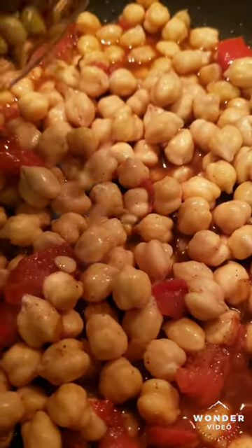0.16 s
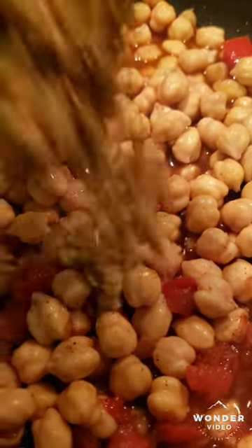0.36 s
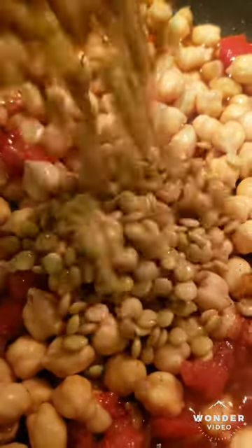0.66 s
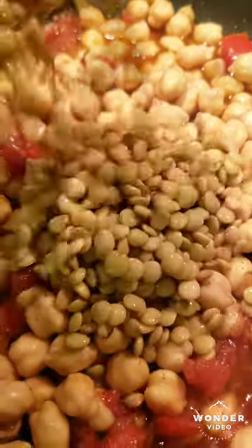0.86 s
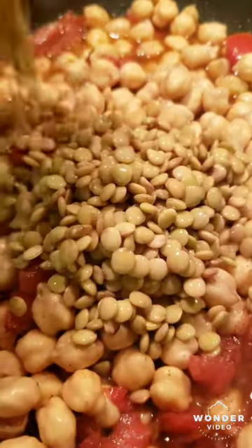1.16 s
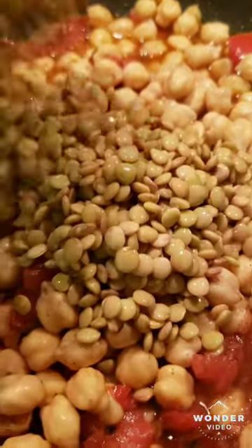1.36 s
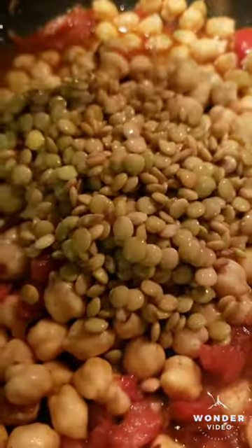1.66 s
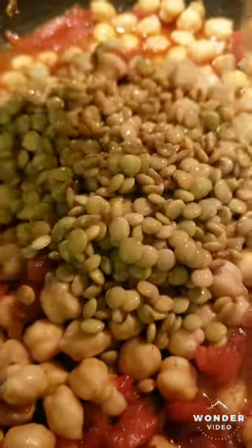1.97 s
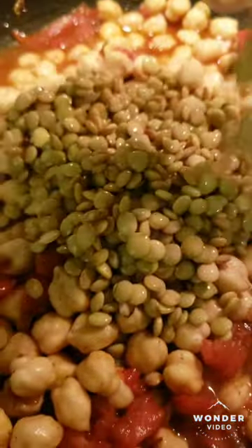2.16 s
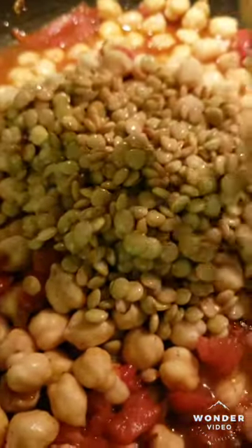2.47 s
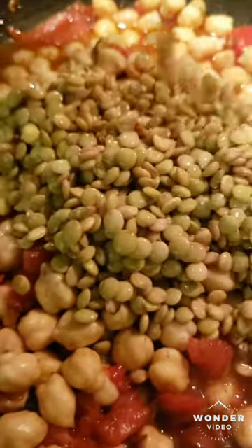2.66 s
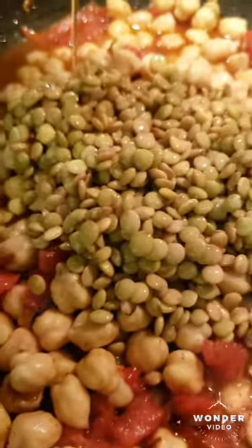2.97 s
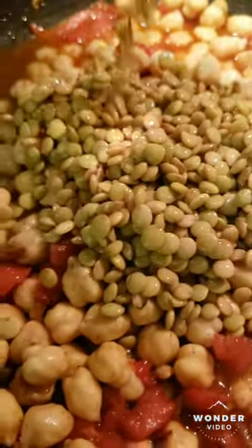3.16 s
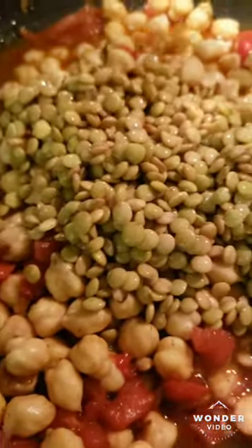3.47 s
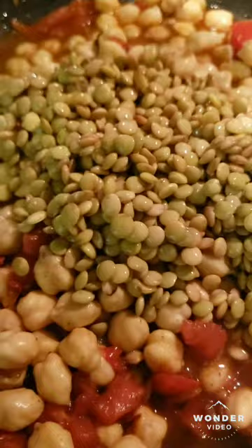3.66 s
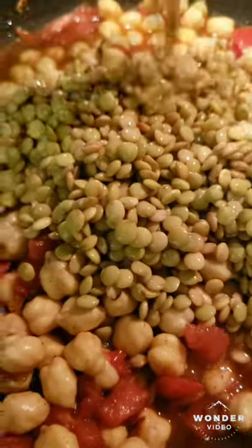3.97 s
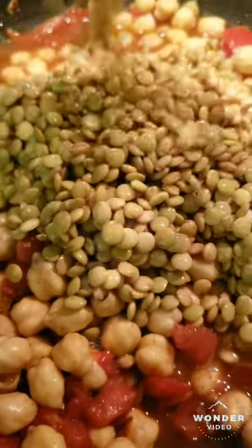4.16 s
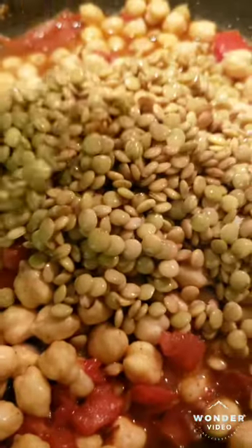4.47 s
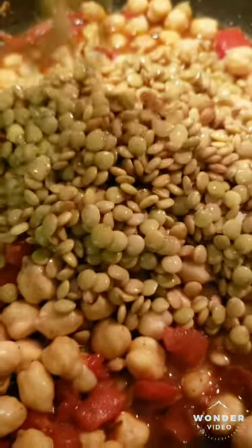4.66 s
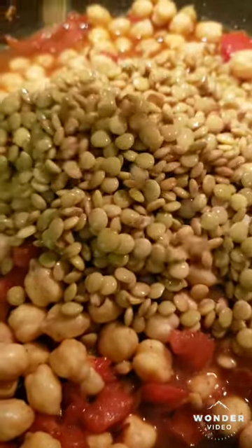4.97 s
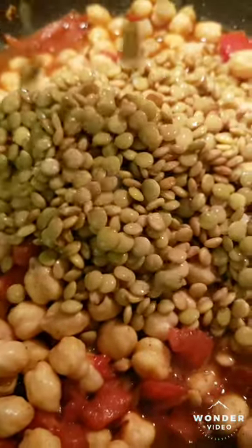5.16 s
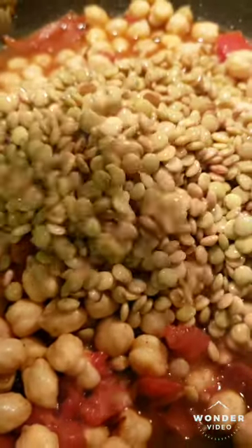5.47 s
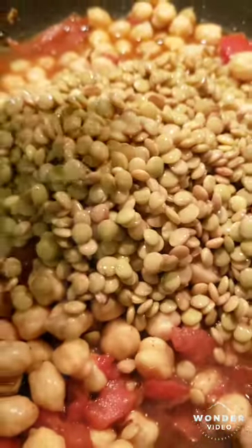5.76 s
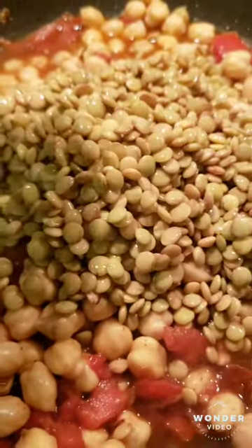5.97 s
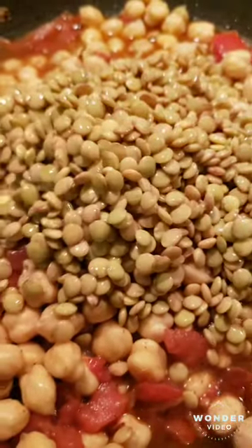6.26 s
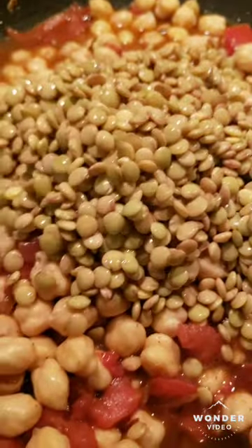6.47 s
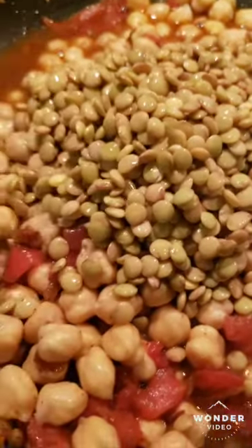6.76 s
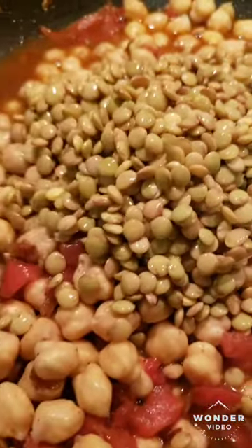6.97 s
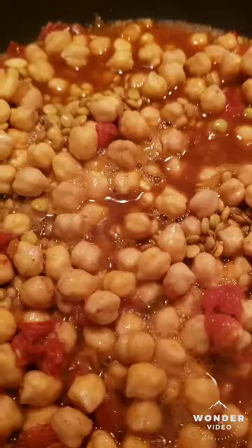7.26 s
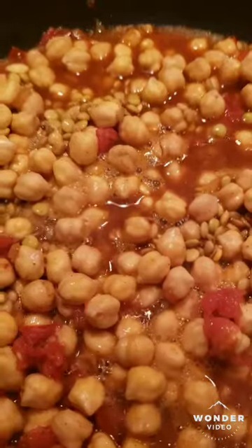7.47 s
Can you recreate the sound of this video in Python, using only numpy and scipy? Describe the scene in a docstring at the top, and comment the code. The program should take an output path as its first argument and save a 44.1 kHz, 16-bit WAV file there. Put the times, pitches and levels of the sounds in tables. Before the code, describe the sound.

A close stereo microphone hears lentils scattering onto simmering chickpeas: first a few clicks, then fuller rushes of grainy patter, separated by sparse drops. Faint bright sizzling swells with each pour, with little snaps and spits. Steady fan hum and air sit behind in the small room. Finally only fan and faint simmer remain before light contacts rattle, the full pan thuds once, sauce slops, and sound cuts out momentarily.

```python
"""In a small kitchen, a phone close to the pan hears lots of dry lentils poured onto simmering chickpeas.
The lentils are tiny ringing clicks and soft thuds, the wet crackle is shorter, brighter grains.
Lentils striking or bubbles popping add short clicks, each a noisy snap and a two-part ring; spits of sauce
are ticks of noise; a fan of steady tones and filtered air hums behind. At the end something clatters, the
pan takes one dull knock from a push and damped modes, and the sound drops out for a moment."""
import sys
import numpy as np
from scipy import signal
from scipy.fft import rfft, irfft
from scipy.io import wavfile
from scipy.ndimage import uniform_filter1d

SR = 44100
rng = np.random.default_rng(int(sys.argv[2]) if len(sys.argv) > 2 else 0)


def master(y):
    """Save y as 16-bit WAV."""
    cut = np.clip(np.atleast_2d(y).T, -1, 1)
    pcm = np.round(cut * 32767)  # scale
    wavfile.write(sys.argv[1], SR, pcm.astype(np.int16))


N = 335619
TIME = np.arange(N) / SR

# Levels in these tables are relative: each source adds its own trim, tone and room.
# Lots of lentils tipped in. Each row: start in seconds, length in seconds, patter level in dB,
# soft thud level in dB, wet crackle level in dB.
LENTIL_LOTS = [(0.086, 0.072, -63, -77, -75.5), (0.338, 0.25, -62.5, -66, -75.5),
               (0.589, 0.49, -55.5, -58.5, -66.5), (1.156, 0.19, -62, -65, -69),
               (1.44, 0.36, -60, -67, -72.5), (1.94, 0.12, -65.5, -65, -76.5),
               (2.337, 0.028, -64.5, -63, -74), (2.438, 0.072, -54.5, -56, -65),
               (2.552, 0.29, -53.5, -59, -66), (3.355, 0.15, -66, -90, -73.5), (3.809, 0.15, -65, -70, -73),
               (3.983, 0.099, -58.5, -67.5, -73.5), (4.085, 0.025, -60, -65.5, -66),
               (4.186, 0.13, -54.5, -65, -66), (4.41, 0.076, -63, -69, -74),
               (4.695, 0.044, -65, -65, -77.5), (4.87, 0.12, -61.5, -67.5, -73.5),
               (5.109, 0.078, -65, -70, -82), (5.325, 0.13, -63, -71, -79),
               (5.536, 0.26, -61, -63.5, -76.5)]
# A lot builds up quickly, thins while it runs, then the last grains settle; the wet crackle lingers.
ATTACK_S, THINNING_DB_PER_S = 0.013, 5
SETTLE_DB_PER_S, CRACKLE_SETTLE_DB_PER_S = 97, 63
# The food simmering by itself. Each row: time in seconds, crackle level in dB.
SIMMER_LEVEL = [(0, -77.5), (2.3, -74.5), (3.2, -83), (5.9, -79.5), (6.2, -93), (6.7, -87), (7.44, -84),
                (7.5, -70)]
# Short ringing clicks, lentils striking and bubbles popping, loud and faint.
# Each row: start in seconds, level in dB, pitch in Hz.
TIMED_CLICKS = [(0.0887, -30, 3600), (0.1785, -45.5, 1980), (0.354, -46, 3670), (0.392, -35.5, 3700),
                (0.61, -26.5, 4330), (0.684, -32.5, 3050), (0.7645, -44, 3150), (0.8411, -35, 3380),
                (0.8496, -34, 2670), (0.8687, -35, 3460), (0.9026, -44, 2800), (0.9228, -45, 2950),
                (1.043, -31, 3800), (1.141, -36.5, 3450), (1.2155, -31, 5450), (1.487, -33, 3140),
                (1.507, -37.5, 3420), (1.964, -31, 5100), (1.991, -39.5, 3720), (2.0762, -48, 2080),
                (2.504, -46, 3000), (2.5576, -43, 2300), (2.574, -40, 4800), (2.5825, -44, 2840),
                (2.734, -38.5, 3060), (2.7584, -33, 3920), (2.8058, -41, 1990), (2.8377, -44, 3190),
                (2.878, -39.5, 1530), (3.3683, -45, 2780), (3.477, -51, 3000), (3.509, -53, 2420),
                (3.72, -46.5, 1490), (3.8507, -41.5, 3020), (3.9205, -40, 3760), (3.9474, -36.5, 3330),
                (3.991, -38.5, 1450), (3.9941, -42, 2650), (4.1163, -29, 5500), (4.1358, -44, 1700),
                (4.1518, -31, 4650), (4.2103, -40, 2760), (4.2368, -34, 3350), (4.252, -41, 2600),
                (4.287, -43, 2950), (4.3209, -37, 3300), (4.328, -35, 4070), (4.445, -38, 5700),
                (4.73, -52, 2690), (4.8851, -36, 2800), (4.9156, -31.5, 2840), (5.0243, -46.5, 2710),
                (5.133, -48, 2770), (5.1548, -49, 1920), (5.24, -48, 2700), (5.329, -43.5, 2670),
                (5.388, -34, 2660), (5.414, -37.5, 2700), (5.5665, -40.5, 2720), (5.6021, -35.5, 2780),
                (5.6663, -41, 2740), (5.784, -37.5, 2620), (6.1674, -49.5, 1430), (6.264, -49.5, 1700),
                (6.3994, -39, 1510)]
# Spits of sauce. Each row: start in seconds, level in dB.
SAUCE_SPITS = [(0.0238, -48.5), (1.3872, -49.5), (1.5803, -47.5), (2.076, -51), (2.2112, -45), (2.521, -51),
               (2.955, -51), (2.973, -48), (3.7123, -49), (3.7445, -38), (4.9783, -49.5), (5.704, -47),
               (5.905, -46.5)]
# Sauce slopping after the knock. Each row: start in seconds, level in dB.
SAUCE_SLOPS = [(7.135, -46), (7.1395, -27), (7.1428, -27.5), (7.154, -44), (7.2134, -37)]
# Light contacts of something being put down. Each row: start in seconds, level in dB, pitch in Hz.
CLATTER_CONTACTS = [(6.8347, -39, 1550), (6.8419, -36, 1770), (6.9018, -27, 4750), (6.9123, -28.5, 2580),
                    (6.9155, -31.5, 1680), (6.9195, -26.5, 1570), (6.924, -28, 5130), (6.9275, -28, 2520),
                    (6.936, -29, 5000), (6.9513, -33, 1700), (6.958, -25, 1630), (6.9679, -20.5, 1530),
                    (6.974, -24, 1730), (7.006, -44, 1260), (7.021, -40, 2700)]
# Ring of the full pan. Each row: frequency in Hz, level in dB, time to fall 60 dB in seconds.
FULL_PAN_MODES = [(65.4, -14, 0.6), (89.6, -0.5, 0.26), (200.4, 0.5, 0.41), (288, 2, 0.25), (324, -6, 0.35),
                  (387, -5, 0.32), (460, 3.5, 0.26), (707, 10.5, 0.09), (733, -7, 0.43), (846, -2, 0.37),
                  (907, 1, 0.31), (947, -1.5, 0.29), (1222, -11, .33), (1440, -5, 0.15), (1600, -11, 0.24),
                  (3490, -11, 0.04), (4260, -10.5, 0.028)]
# Fan and mains hum. Each row: frequency in Hz, rms level in dB.
HUM_LINES = [(52.7, -57.5), (59.9, -62), (88.5, -62), (105, -71), (110.5, -72.5), (120, -62), (176.6, -70),
             (210, -68.5), (238, -69.5), (262.3, -73), (297, -73), (415.3, -77)]

# Tone of each sound. Each row: frequency in Hz, gain in dB.
PATTER_SPECTRUM = [(500, 2), (1000, -1.5), (1400, 7.5), (2000, 1.5), (2900, 3.5), (4500, -1), (6300, -17.5),
                   (7800, -19), (15000, -18)]
THUD_SPECTRUM = [(60, 0.5), (150, 8), (320, 5), (550, 7.5), (800, 2.5), (1300, -1), (1900, 2),
                 (3000, -31.5)]
CRACKLE_SPECTRUM = [(1500, 5), (4000, -5.5), (6500, -3.5), (7800, -12.5), (8700, -4.5), (10600, -7.5),
                    (11600, -0.5), (13200, 4), (15800, -3)]
CLICK_SPECTRUM = [(600, -19.5), (1300, 7.5), (4000, 5), (5500, 1.5), (7600, -13), (15000, -18)]
SPIT_SPECTRUM = [(1200, -5), (4000, -10), (6000, -11), (7700, -8), (9300, -0.5), (11000, -5), (12800, 9),
                 (15800, 5)]
SLOP_SPECTRUM = [(3000, 1.5), (7700, -11.0), (9500, -3.5), (12500, -5.5), (15800, -10)]
CLATTER_SPECTRUM = [(300, -50), (720, -8), (950, -15), (1500, -5), (2600, -3.5), (4000, -10.5), (5000, -10),
                    (7000, -31.5), (15000, -38)]
KNOCK_SPECTRUM = [(30, -62), (55, -49), (150, 1), (350, 3), (560, 3), (720, 5.5), (920, 7), (1040, -5.5),
                  (1700, -6.5), (2800, -18), (4000, -15.5), (6000, -29.5), (15000, -42)]
BUBBLING_SPECTRUM = [(300, 3), (700, 3), (1600, -4), (3000, -12), (5000, -13), (8000, -27)]
AIR_SPECTRUM = [(20, -24.5), (50, 10.5), (110, -1), (145, -4.5), (200, 5.5), (255, -8), (335, 8),
                (385, -4.5), (470, -5), (560, -13), (1000, -19.5), (1700, -17.5), (3200, -33.5),
                (6300, -34), (7800, -39), (9000, -34), (15000, -34.5)]
# Air alike at both microphones, and air different at each. Each row: frequency in Hz, gain in dB.
SHARED_AIR = [(150, 0), (500, -5.5), (1500, -15.0)]
SEPARATE_AIR = [(60, -24.0), (250, -3.0), (600, -1.5), (1500, 4.0)]

# Left microphone minus right, for the fan and for the knock and clatter.
# Each row: frequency in Hz, level difference in dB.
FAN_SIDE = [(100, 1), (200, -4), (400, -7), (800, -6), (1400, -8.5), (3000, 5), (8000, -13.5),
            (15000, -1.5)]
KNOCK_AND_CLATTER_SIDE = [(150, 0), (400, -5.5), (700, -7), (1300, -11.5), (2400, -7), (4400, -8),
                          (9000, -16.5)]
# The dropout: start in seconds, end in seconds.
DROPOUT = (7.44, 7.502)
TOP_HZ = 15900


def lentils(per_s=620, spread_db=4.5, patter_db=-2.0, thud_db=-3, clump_db=1.0):
    """Each lentil clicks at its own pitch; a separate layer of impacts thuds softly into the food."""
    clumps = undb(clump_db * gusts(70))  # the grains slide out in clumps
    patter_grains = grains(940, 7700, 8, per_s, spread_db) * clumps
    patter = unit(colour(patter_grains, PATTER_SPECTRUM)) * undb(patter_db)
    patter = patter * flow(SETTLE_DB_PER_S, column=2)
    landings = impacts(900, 2.1) * clumps
    thuds = unit(colour(landings, THUD_SPECTRUM)) * undb(thud_db)
    thuds = thuds * flow(SETTLE_DB_PER_S, column=3)
    patter_in_room = kitchen(patter, -3, 0.08) * balance(-1.5)
    thuds_in_room = kitchen(thuds, 0, 0.24) * balance(-0.72)
    return left_first(patter_in_room + thuds_in_room)


def flow(settle_db_per_s, column):
    """Gain of one sound of the pour: every lot rises, thins and settles, and overlapping powers add."""
    power = 0
    for lot in LENTIL_LOTS:
        since_start = TIME - lot[0]
        thinning = THINNING_DB_PER_S * np.maximum(since_start, 0)
        settling = settle_db_per_s * np.maximum(since_start - lot[1], 0)
        rise = np.clip(since_start / ATTACK_S, 0, 1)
        power = power + (undb(lot[column] - thinning - settling) * rise) ** 2
    return np.sqrt(power)


def sizzle(level_db=-6, per_s=1500, spread_db=4.0, spurt_db=1.5):
    """Tiny wet films burst in spurts close to the right microphone, more strongly under each lot."""
    bursts = grains(3860, 15900, 13.6, per_s, spread_db, size=128) * undb(spurt_db * gusts(45))
    simmer = undb(curve(SIMMER_LEVEL))
    activity = np.hypot(simmer, flow(CRACKLE_SETTLE_DB_PER_S, column=4))
    crackle = unit(colour(bursts, CRACKLE_SPECTRUM)) * undb(level_db) * activity
    return kitchen(crackle, -0.35, 0.061) * balance(-27)


def clicks(cycles=10, level_db=4, snap=0.26, rise_t60_s=0.0035, under_db=-11, under_ratio=0.53):
    """Short clicks, lentils striking or bubbles popping: a noisy snap and a two-part ring."""
    track, t = np.zeros(N), TIME[:SR // 25]
    for s, db, hz in TIMED_CLICKS + small_pops():
        main = np.sin(2 * np.pi * hz * t)
        under = undb(under_db) * np.sin(2 * np.pi * hz * under_ratio * t)  # weaker and lower
        ring = (main + under) * fade(t, cycles / hz)
        noisy_snap = snap * rng.standard_normal(len(t)) * fade(t, 0.0099)
        add(track, s, undb(db + level_db) * (ring + noisy_snap) * (1 - fade(t, rise_t60_s)))
    return left_first(kitchen(colour(track, CLICK_SPECTRUM), -2.0, 0.11)) * balance(-3.5)


def small_pops(per_s=9, over_flow_db=13, top_db=-48, scatter_db=2.5, centre_hz=3100, octaves=0.41):
    """Landing lentils burst small bubbles at random, louder in a stronger flow: rows like TIMED_CLICKS."""
    chance = rng.standard_normal((200, 3))
    gaps = np.abs(chance[:, 0]) * np.sqrt(np.pi / 2) / per_s  # mean gap 1 / per_s
    flow_db = 20 * np.log10(flow(SETTLE_DB_PER_S, column=2) + 1e-9)
    pops = []
    for s, (_, loud, high) in zip(np.cumsum(gaps), chance):
        if s < TIME[-1]:
            typical_db = min(flow_db[int(s * SR)] + over_flow_db, top_db)  # capped before the scatter
            pops.append((s, typical_db + scatter_db * loud, centre_hz * 2 ** (octaves * high)))
    return pops


def spits(spit_db=-2, slop_db=-4):
    """Spitting and slopping sauce makes sharp bright ticks: short noise bursts, mostly to the right."""
    spitting = colour(ticks(SAUCE_SPITS, 0.015, 0.0048, growth=0.14), SPIT_SPECTRUM)
    slopping = colour(ticks(SAUCE_SLOPS, 0.024, 0.0041), SLOP_SPECTRUM)
    sauce = undb(spit_db) * spitting + undb(slop_db) * slopping
    return kitchen(sauce, -3.5, 0.15) * balance(-17.0)


def clatter(level_db=3.5, cycles=12):
    """A quick run of hard, light contacts, each a crack and a brief ring at its own pitch."""
    contacts = ticks([row[:2] for row in CLATTER_CONTACTS], 0.02, 0.0018, growth=0)
    t = TIME[:SR // 25]
    for s, db, hz in CLATTER_CONTACTS:
        add(contacts, s, undb(db) * np.sin(2 * np.pi * hz * t) * fade(t, cycles / hz))
    in_room = kitchen(colour(contacts, CLATTER_SPECTRUM), -2.5, 0.46)
    return undb(level_db) * lean(in_room, KNOCK_AND_CLATTER_SIDE)


def knock(s=7.1317, ring_db=-34.5, blow_db=1.5, shudder_db=-13, settle_s=0.01195, settle_db=-27):
    """One blow: a hard push, a shudder, the pan's damped modes, and the contents' low thump a moment later."""
    t = TIME[:SR // 2]
    ring, blow = np.zeros(N), np.zeros(N)
    modes = sum(-undb(db) * np.sin(2 * np.pi * hz * t) * fade(t, t60) for hz, db, t60 in FULL_PAN_MODES)
    thump = np.sin(2 * np.pi * 290 * t) * fade(t, 0.058)
    shudder = rng.standard_normal(len(t)) * fade(t, 0.086)
    add(ring, s, undb(ring_db) * modes)
    add(ring, s + settle_s, undb(settle_db) * thump)
    add(blow, s, undb(shudder_db) * shudder)
    add(blow, s, -undb([blow_db]))  # the push: one sample
    in_room = kitchen(colour(blow, KNOCK_SPECTRUM), -2.5, 0.57)
    return lean(ring + in_room, KNOCK_AND_CLATTER_SIDE)


def bubbling(level_db=-61, per_s=1500, spread_db=3.5):
    """After the dropout the food bubbles more fully: dense random impacts with a low, soft tone."""
    blips = unit(colour(impacts(per_s, spread_db), BUBBLING_SPECTRUM))
    blips = blips * undb(level_db) * (TIME > DROPOUT[1])
    return kitchen(blips, -1.2, 0.12) * balance(-6.0)


def fan(air_db=-60):
    """Steady motor lines beat against each other over rushing air; the bass is alike at both microphones."""
    hum = 0
    for hz, db in HUM_LINES:
        hum = hum + undb(db) * np.sqrt(2) * np.sin(2 * np.pi * (hz * TIME + rng.random()))
    shared = colour(rng.standard_normal(N), SHARED_AIR)
    apart = colour(rng.standard_normal((2, N)), SEPARATE_AIR)
    air = undb(air_db) * unit(colour(shared + apart, AIR_SPECTRUM))
    return lean(hum + air, FAN_SIDE)


def grains(low_hz, high_hz, cycles, per_s, spread_db, size=256):
    """Tiny impacts, many weak and few strong, each ringing at its own pitch, 60 dB down after its cycles."""
    gap, high, loud = rng.random((30000, 3)).T
    starts = (np.cumsum(-np.log(gap)) / per_s * SR).astype(int)
    heard = starts < N
    hz = (low_hz + (high_hz - low_hz) * high[heard])[:, None]
    strength = undb(spread_db * np.minimum(-np.log(loud[heard]), 3.6))[:, None]
    t = TIME[:size]
    rings = strength * np.sqrt(hz) * np.sin(2 * np.pi * hz * t) * fade(t, cycles / hz)
    places = starts[heard, None] + np.arange(size)
    track = np.bincount(places.ravel(), rings.ravel(), N)[:N]
    return signal.sosfilt(signal.butter(2, low_hz / 2, "high", fs=SR, output="sos"), track)


def impacts(per_s, spread_db):
    """Random one-sample impacts of either sign: many weak, few strong."""
    size = undb(spread_db * np.minimum(rng.exponential(size=N), 3.6))
    struck = rng.random(N) < per_s / SR
    return unit(struck * size * rng.choice([-1, 1], N))


def ticks(rows, t60, rise_t60_s, growth=.15):
    """A noise burst for each row of seconds and dB; with growth, weaker ones die sooner than the strongest."""
    track, t = np.zeros(N), TIME[:SR // 25]
    top = max(db for s, db in rows)
    for s, db in rows:
        shape = fade(t, t60 * undb(growth * (db - top))) * (1 - fade(t, rise_t60_s))
        add(track, s, undb(db) * rng.standard_normal(len(t)) * shape)
    return track


def gusts(per_s):
    """Random levels around zero, per_s new ones a second, joined by straight lines."""
    return 1.2 * np.interp(TIME * per_s, np.arange(1000), rng.standard_normal(1000))


def kitchen(x, wet_db, t60):
    """Direct sound plus dense decaying reflections, different at each microphone."""
    t = TIME[:SR // 2]
    arrival = np.clip((t - .001) / 0.00074, 0, 1)  # reflections begin after 1 ms
    tail = rng.standard_normal((2, len(t))) * fade(t, t60) * arrival
    response = undb(wet_db) * tail / np.sqrt(np.sum(tail ** 2) / 2)
    response[:, 0] = 1  # direct sound
    return signal.oaconvolve(np.atleast_2d(x), response, axes=1)[:, :N]


def left_first(x, samples=16):
    """Sound from the pan reaches the left microphone a few samples before the right."""
    return np.vstack([x[0], np.roll(x[1], samples)])


def balance(db):
    """Left and right gains for a level difference, left minus right."""
    return undb(np.array([[db], [-db]]) / 2)


def lean(x, side):
    """Level difference between the microphones that changes with frequency."""
    channels = []
    for channel, sign in zip(x, (1, -1)):
        channels.append(colour(channel, [(hz, sign * db / 2) for hz, db in side]))
    return np.vstack(channels)


def colour(x, points):
    """Causal minimum-phase filter, its dB gain joined by straight lines over log frequency."""
    size = 2048
    hz, db = np.transpose(points)
    bins_hz = np.arange(size // 2 + 1) * SR / size + 1  # 1 Hz up, so the logarithm exists
    log_gain = np.log(undb(np.interp(np.log(bins_hz), np.log(hz), db)))
    cepstrum = irfft(log_gain)[:size // 2]
    cepstrum[1:] *= 2  # folded forward in time
    response = irfft(np.exp(rfft(cepstrum, size)))
    return signal.oaconvolve(np.atleast_2d(x), response[None], axes=1)[:, :x.shape[-1]]


def fade(t, t60):
    """Free decay, 60 dB down after t60 seconds."""
    return np.exp(-np.log(1000) * t / t60)


def curve(rows, column=1):
    """One column of a table joined by straight lines in time."""
    rows = np.array(rows)
    return np.interp(TIME, rows[:, 0], rows[:, column])


def undb(db):
    """Decibels to gain."""
    return 10 ** (np.asarray(db) / 20)


def unit(x):
    """Scale to rms 1."""
    return x / np.sqrt(np.mean(x ** 2))


def add(track, s, sound):
    """Mix a sound in at a time in seconds."""
    start = int(s * SR)
    track[start:start + len(sound)] += sound[:N - start]


def scene():
    """Everything at the stove, from the pour to the fan behind it."""
    food = lentils() + sizzle() + clicks() + spits()
    return food + clatter() + knock() + bubbling() + fan()


def record(dry):
    """The microphone passes no deep rumble; the sound drops out briefly near the end; the top is cut."""
    live = 1. * ((TIME < DROPOUT[0]) | (TIME > DROPOUT[1]))
    live = uniform_filter1d(live, size=128)  # soft edges
    thin = signal.sosfilt(signal.butter(2, 35, "high", fs=SR, output="sos"), dry)
    return signal.sosfilt(signal.ellip(10, .2, 70, TOP_HZ, fs=SR, output="sos"), thin * live)


dry = scene()
out = record(dry)
master(out)
```